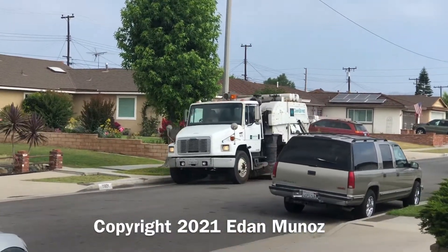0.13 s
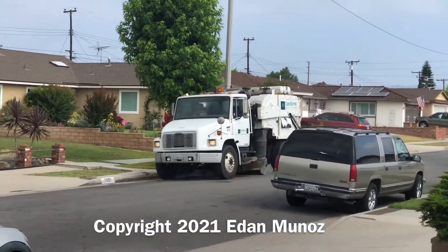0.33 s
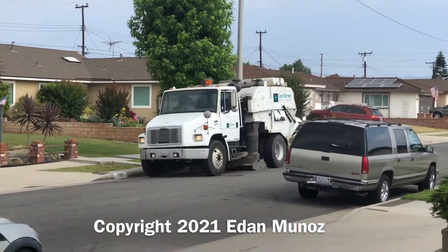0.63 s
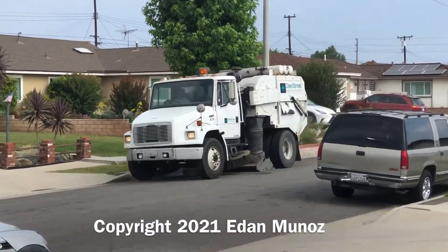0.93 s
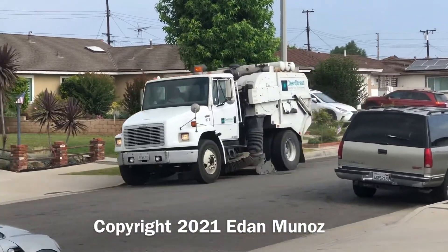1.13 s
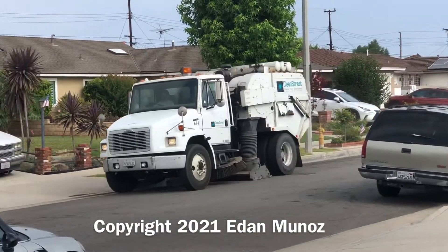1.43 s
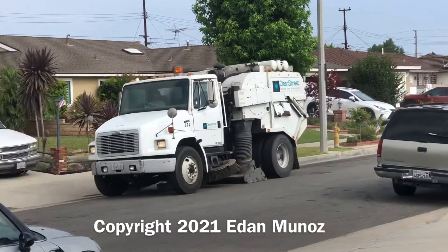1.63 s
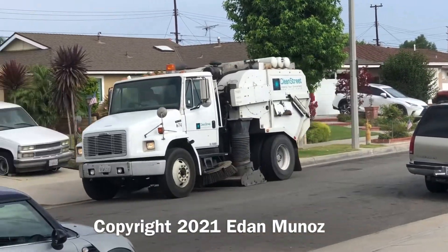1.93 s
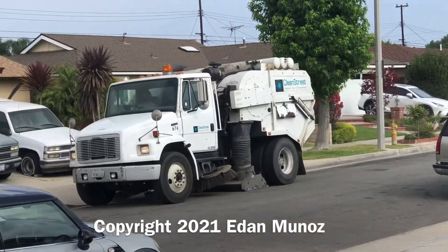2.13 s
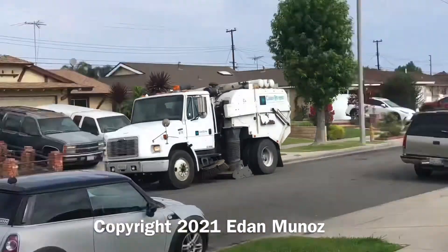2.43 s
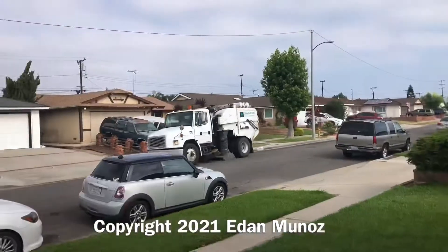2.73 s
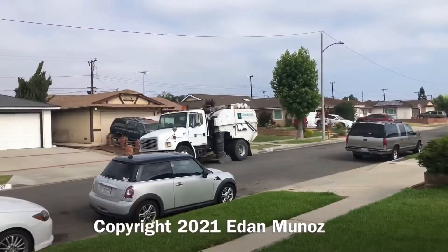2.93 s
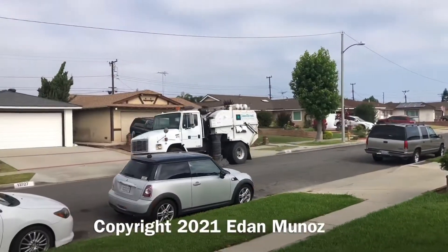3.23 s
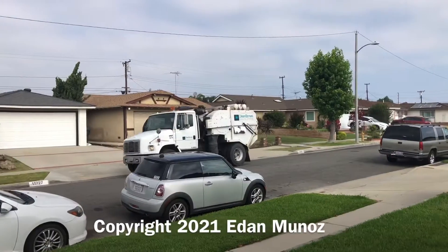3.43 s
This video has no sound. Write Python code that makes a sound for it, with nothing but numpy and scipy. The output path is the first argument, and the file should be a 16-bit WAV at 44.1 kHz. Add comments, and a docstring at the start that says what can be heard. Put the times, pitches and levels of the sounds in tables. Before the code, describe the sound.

Continuous street sweeper noise outdoors: low roar and engine drone from the start, a clean suction hum swelling within the first second or so, steady bristly scrubbing and faint high hiss, one microphone across the road.

```python
"""A quiet residential street, heard from a lawn across the road by one microphone: a street sweeper rolls slowly along.
Its suction blower hums a clean tone with faint overtones, and two diesels drone below it: all stacked sines.
Faint whines waver in the roar of air through the ducts, which is noise shaped to a low, broad spectrum.
Brooms scrub the asphalt as noise thickened with random ticks, and a thin high hiss of noise comes and goes."""
import sys
import numpy as np
from scipy import signal
from scipy.fft import rfft, irfft
from scipy.io import wavfile

SR = 44100
rng = np.random.default_rng(int(sys.argv[2]) if len(sys.argv) > 2 else 0)


def digitize_waveform(pressure):
    """Quantize a signal to 16-bit integers and store it at the path in sys.argv[1].

    Rows of a 2-D input are taken as channels; values are limited to [-1, 1].
    """
    field = np.atleast_2d(pressure).T
    bounded = np.clip(field, -1, 1)
    quanta = np.round(bounded * 32767).astype(np.int16)
    wavfile.write(sys.argv[1], SR, quanta)


def boost_factor(decibels):
    """Convert a level in decibels to a linear amplitude factor."""
    exponent = np.asarray(decibels, float) / 20
    return 10 ** exponent


N = 157437   # length in samples

# In all tables level_db is rms before any waver; waver_db is the spread of a slow random level change.
BLOWER_HZ = 172.7
# Blower tone as the truck clears a parked car and draws level: start_s, level_db
BLOWER_TONE_LEVEL = [(0.0, -36), (0.05, -31.5), (0.25, -37.5), (0.31, -43), (0.34, -43), (0.53, -31.5),
                     (0.82, -23), (0.97, -25.5), (1.39, -19), (1.96, -20.5), (2.2, -16.5), (2.6, -19.5),
                     (3.54, -21), (3.57, -20.5)]
# Blower overtones: multiple, level_db, waver_db
BLOWER_OVERTONES = [(2, -51, 2.5), (3, -56, 1), (4, -51, 0.5), (5, -57.5, 1.5), (6, -56.5, 0)]
# Blower overtones that swell as their beam sweeps past: multiple, middle_s, half_length_s, peak_level_db
BLOWER_SWELLS = [(2, 2.15, .3, -40.5), (2, 3.35, 0.2, -40), (4, 1.5, .4, -47.5), (4, 3.1, .4, -44.5),
                 (5, 0.14, 0.24, -45), (6, 1.2, 0.37, -43.5), (6, 1.9, .6, -50.5)]

SWEEPER_CYCLE_HZ = 15.345
# Sweeper engine, reference level for its orders: start_s, level_db
SWEEPER_ENGINE_LEVEL = [(0.0, -35), (0.05, -38), (0.26, -42), (0.64, -34), (0.73, -48), (1.21, -30),
                        (1.62, -26), (1.76, -31), (3.54, -26.5), (3.57, -30)]
# Sweeper engine orders: multiple of the cycle, relative_level_db, waver_db
SWEEPER_ORDERS = [(4, -24, 4), (5, 0.5, 1.3), (6, -13, 3.5), (7, -19, 2.5), (10, -16.5, 4), (13, -22, 3),
                  (16, -23.5, 3)]

# Drive engine speed, picking up a little: start_s, firing_hz
DRIVE_SPEED = [(0, 54.7), (1.0, 54.8), (1.8, 55.1), (2.5, 55.35), (3.57, 55.3)]
# Drive engine, reference level for its orders above the firing note: start_s, level_db
DRIVE_ENGINE_LEVEL = [(0.0, -31), (0.07, -32), (0.2, -40.5), (0.51, -36.5), (1.4, -41), (1.5, -33.5),
                      (1.74, -39), (2.02, -37), (2.18, -39), (2.23, -52), (2.3, -39), (2.99, -31.5),
                      (3.53, -40), (3.57, -46)]
# Drive engine orders: multiple of the firing rate, relative_level_db, waver_db
DRIVE_ORDERS = [(2, 1.5, -0.7), (3, -10.5, 5.5)]
# Upper orders that swell in passing: multiple of the firing rate, middle_s, half_length_s, peak_level_db
DRIVE_SWELLS = [(5, 1.52, 0.42, -45.5), (12, 0.99, .8, -45.5), (12, 2.7, 0.81, -51)]
# Firing note, swelling as the exhaust turns this way: start_s, level_db
DRIVE_FIRING_LEVEL = [(0, -49), (1.2, -49), (2.5, -50), (3.0, -43), (3.57, -37)]

# Faint whines of steady pitch: pitch_hz, level_db, waver_db
WHINES = [(469.3, -51, 3.5), (704, -58.5, 3), (1580, -58, 2.5)]

# Air and engine roar, before a fixed lift in roar(): start_s, level_db
ROAR_LEVEL = [(0, -35), (.3, -34), (.7, -34), (1.1, -33.3), (1.5, -32.5), (1.85, -33), (2.1, -34),
              (2.4, -31.5), (2.7, -33.5), (3.0, -33.5), (3.3, -33), (3.57, -32)]
# Roar colour, relative only: frequency_hz, density_db (per Hz)
ROAR_SPECTRUM = [(22, -26), (30, -22), (45, -11), (60, -8.5), (90, 7), (130, -0.5), (190, 1), (270, -3.5),
                 (370, -2.5), (450, -6.5), (550, -9), (630, -4.5), (800, -8), (1000, -6), (1400, -11),
                 (2000, -16), (3000, -28)]

# Brooms on asphalt, before a fixed lift in brooms(): start_s, level_db, treble_db (against the body)
BROOM_LEVEL = [(0, -36, -4.5), (.12, -36.5, -4.5), (.3, -37.5, -6.5), (.5, -37, -6), (.75, -37.5, -5.5),
               (1.0, -37, -5.5), (1.2, -35.5, -4.5), (1.35, -35, -4.5), (1.6, -35.5, -4.5),
               (1.8, -35.5, -5.5), (1.95, -35, -5), (2.08, -34, -4), (2.3, -34.5, -4.5), (2.42, -35, -7),
               (2.6, -34.3, -5.5), (2.75, -35, -6.5), (2.9, -36, -6), (3.1, -36.5, -5.5), (3.3, -37, -6),
               (3.57, -37, -5.5)]
# Broom colour, relative only: frequency_hz, density_db (per Hz)
BROOM_SPECTRUM = [(1200, -11), (2000, -3.5), (2800, -2.5), (3800, -0.5), (5000, -2.5), (5800, -6),
                  (7000, -8), (8500, -9), (9500, -14), (12000, -17.5), (15500, -20)]
BRISTLES_PER_S, BRISTLE_DB = 3000, -9   # tick rate, and tick level against the scrub
BROOM_BRIGHTENS = 1.03   # share of the treble swing per octave above 4 kHz

# High hiss, before a fixed lift in hiss(): start_s, level_db
HISS_LEVEL = [(0.0, -45), (0.05, -42), (0.28, -50), (0.4, -44), (0.42, -42), (0.58, -48), (0.77, -44),
              (0.8, -49), (0.87, -48), (1.2, -51), (1.31, -43), (1.36, -45), (1.89, -49), (2.2, -45.5),
              (2.57, -48), (3.33, -52), (3.46, -51), (3.57, -57)]
# Hiss colour, relative only: frequency_hz, density_db (per Hz)
HISS_SPECTRUM = [(8000, -21), (10000, -4.5), (12500, 2), (14000, 5), (15800, 10), (17000, -18)]

SPECKLE_DB = 2.5   # spread of the fine flicker in every noise


def rms_one(x):
    """Scales to rms 1."""
    return x / np.sqrt(np.mean(x ** 2) + 1e-20)


def in_time(rows, column=1):
    """Joins one column of a table in time by straight lines."""
    points = np.array(rows)
    return np.interp(np.arange(N) / SR, points[:, 0], points[:, column])


def drift(rate_hz):
    """Slow random wander of spread 1: coarse noise through two equal one-pole low-passes."""
    hop = 40   # samples between coarse points
    r = np.exp(-2 * np.pi * rate_hz * hop / SR)
    noise = rng.standard_normal(N // hop + 2002)
    slow = signal.lfilter([1], [1, -2 * r, r * r], noise)[2000:]   # drop the filter's settling
    return np.interp(np.arange(N) / hop, np.arange(len(slow)), rms_one(slow - slow.mean()))


def tones(speed_hz, orders, rate_hz):
    """Stacks sines on multiples of a shaft speed, each at its rms level and wavering on its own."""
    turn = 2 * np.pi * np.cumsum(speed_hz * np.ones(N)) / SR
    out = 0
    for multiple, level_db, waver_db in orders:
        gain = np.sqrt(2) * boost_factor(level_db + waver_db * drift(rate_hz))
        out = out + gain * np.sin(round(multiple) * turn + rng.uniform(0, 2 * np.pi))
    return out


def swells(speed_hz, rows):
    """Multiples of a shaft speed that rise and fall in a bell."""
    s = np.arange(N) / SR
    out = 0
    for multiple, middle_s, half_s, level_db in rows:
        bell = np.exp(-((s - middle_s) / half_s) ** 2)
        out = out + bell * tones(speed_hz, [(multiple, level_db, 1.5)], rate_hz=3.3)
    return out


def speckled(x):
    """Noise flickers finely: each cell of a half-overlapped 23 ms frame and 86 Hz has its own gain."""
    cells = signal.stft(x, nperseg=1024)[2]
    gain = np.repeat(rng.standard_normal((257, cells.shape[1])), 2, axis=0)[:513]
    return rms_one(signal.istft(cells * boost_factor(SPECKLE_DB * gain), nperseg=1024)[1][:N])


def coloured(source, spectrum, patchy_db, rate_hz, swing_db=0, brightens=0):
    """Shapes a source by a spectrum, then lets third-octave bands flicker, partly together; rms 1."""
    hz = np.fft.rfftfreq(N, 1 / SR) + 1e-3   # keeps the logarithm finite at 0 Hz
    table_hz, table_db = np.array(spectrum).T
    colour_db = np.interp(np.log(hz), np.log(table_hz), table_db, left=-80, right=-80)
    shaped = rfft(speckled(source)) * boost_factor(colour_db)
    place = 3 * np.log2(hz)   # position in third octaves
    first, last = int(3 * np.log2(table_hz[0])), int(3 * np.log2(table_hz[-1])) + 1
    together = drift(rate_hz)
    out = 0
    for k in range(first, last + 1):
        band = irfft(shaped * np.clip(1 - abs(place - k), 0, 1), N)   # triangles that sum to one
        octaves_above = max(k / 3 - np.log2(4000), 0)
        flicker_db = patchy_db * (0.34 * together + drift(rate_hz))
        out = out + band * boost_factor(flicker_db + brightens * octaves_above * swing_db)
    return rms_one(out)


def blower():
    """Blades pass the housing at a steady rate: one clean tone, faint overtones and their swells."""
    tone = boost_factor(in_time(BLOWER_TONE_LEVEL)) * tones(BLOWER_HZ, [(1, 0, 0.59)], rate_hz=4.2)
    overtones = tones(BLOWER_HZ, BLOWER_OVERTONES, rate_hz=2.1)
    return tone + overtones + swells(BLOWER_HZ, BLOWER_SWELLS)


def sweeper_engine():
    """A diesel at steady speed sounds the low orders of its cycle."""
    return boost_factor(in_time(SWEEPER_ENGINE_LEVEL)) * tones(SWEEPER_CYCLE_HZ, SWEEPER_ORDERS, rate_hz=2.35)


def drive_engine():
    """A diesel that picks up a little sounds its firing note and multiples of it."""
    speed_hz = in_time(DRIVE_SPEED)
    orders = boost_factor(in_time(DRIVE_ENGINE_LEVEL)) * tones(speed_hz, DRIVE_ORDERS, rate_hz=3.0)
    firing = boost_factor(in_time(DRIVE_FIRING_LEVEL)) * tones(speed_hz, [(1, 0, 1.5)], rate_hz=3.0)
    return orders + swells(speed_hz, DRIVE_SWELLS) + firing


def whines():
    """Faint tones of fixed pitch that waver within the roar."""
    return sum(tones(hz, [(1, level_db, waver_db)], rate_hz=1.5) for hz, level_db, waver_db in WHINES)


def roar():
    """Turbulent air in the ducts and engine rumble: broad noise, heaviest in the lows."""
    noise = coloured(rng.standard_normal(N), ROAR_SPECTRUM, patchy_db=0.75, rate_hz=3.4)
    return boost_factor(in_time(ROAR_LEVEL) + 2.0) * noise


def brooms():
    """Dense bristle ticks over a smooth scrub, now brighter, now duller."""
    treble_db = in_time(BROOM_LEVEL, column=2)
    ticks = (rng.random(N) < BRISTLES_PER_S / SR) * rng.standard_normal(N)
    source = rng.standard_normal(N) + boost_factor(BRISTLE_DB) * rms_one(ticks)
    scrub = coloured(source, BROOM_SPECTRUM, patchy_db=0.54, rate_hz=8.1,
                     swing_db=treble_db - treble_db.mean(), brightens=BROOM_BRIGHTENS)
    return boost_factor(in_time(BROOM_LEVEL) + 2.5) * scrub


def hiss():
    """Smooth noise at the very top, swelling in puffs."""
    noise = coloured(rng.standard_normal(N), HISS_SPECTRUM, patchy_db=0.9, rate_hz=8.0)
    return boost_factor(in_time(HISS_LEVEL) + 1.0) * noise


def scene():
    """All sources reach one microphone, heard alike on both channels."""
    engines = sweeper_engine() + drive_engine()
    mix = blower() + engines + whines() + roar() + brooms() + hiss()
    return np.tile(mix, (2, 1))


def top_cut(x):
    """Nothing passes above the cut-off."""
    return signal.sosfilt(signal.butter(12, 15740, fs=SR, output="sos"), x)


def record(dry):
    """A steep low-pass removes the top above 15.73 kHz from the finished mix."""
    low_pass = signal.ellip(16, 0.2, 80, 15730, fs=SR, output="sos")
    mix = signal.sosfilt(low_pass, dry)
    return top_cut(mix)


dry = scene()
out = record(dry)
digitize_waveform(out)
```